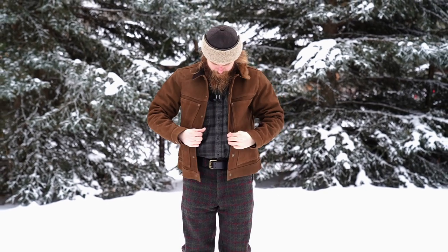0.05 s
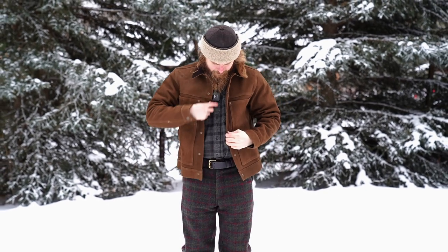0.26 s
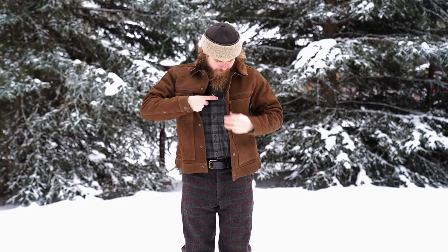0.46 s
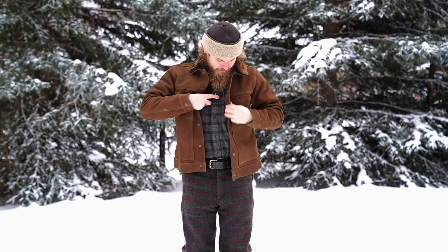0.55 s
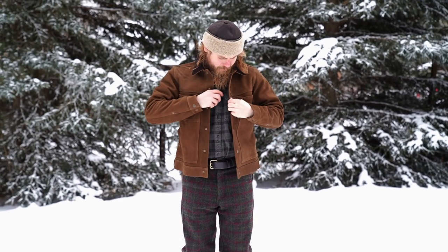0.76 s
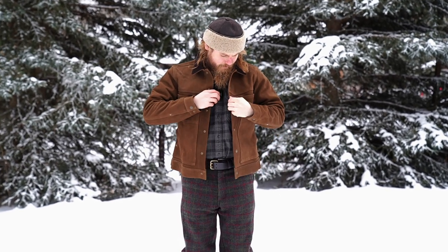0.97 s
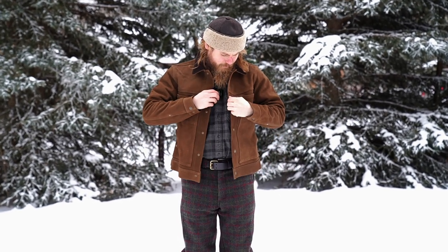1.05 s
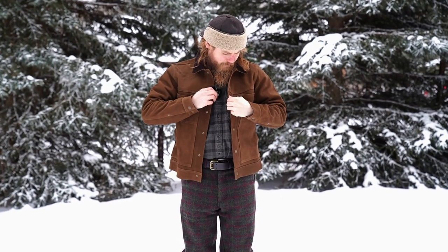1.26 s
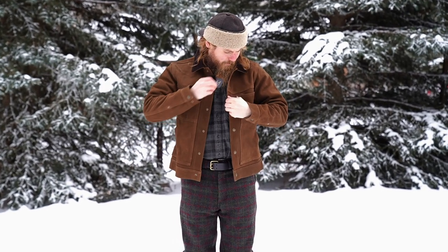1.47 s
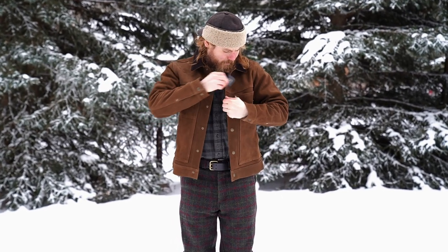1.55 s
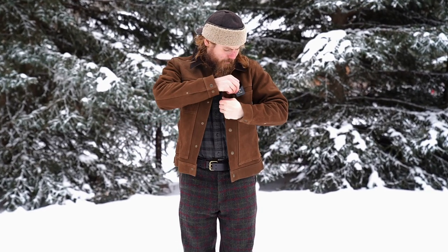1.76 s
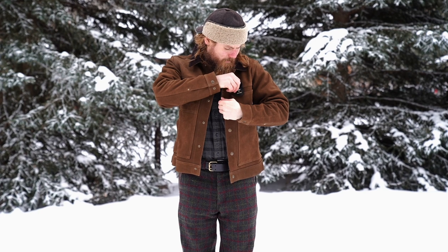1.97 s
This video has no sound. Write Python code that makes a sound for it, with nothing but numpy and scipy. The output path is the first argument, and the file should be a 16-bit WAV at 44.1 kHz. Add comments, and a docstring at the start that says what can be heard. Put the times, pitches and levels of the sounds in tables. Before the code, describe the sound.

A leather jacket rustles close up, starting softly and swelling at about 0.25 seconds. The loudest swishes, with dull flaps and light slaps, come between 0.4 and 0.8 seconds. Lighter strokes and crease ticks follow until 1.4 seconds, then the handling quiets. A soft thump precedes one sharp metal fastener snap at about 1.7 seconds. Faint rustling continues to 2 seconds, with a faint outdoor hush throughout.

```python
"""A leather jacket is pulled shut, close up and dry, on a still, snowy day.
The hide slides over a shirt in uneven strokes, a swish made of thousands of tiny slips a second.
Its heavy panels flap and buckle, folds slap down and creases tick. Near the end, fingers work
a metal fastener, which gives a short, sharp snap. A faint hush of outdoor air lies underneath."""
import sys
import numpy as np
from scipy import signal
from scipy.fft import rfft, irfft, next_fast_len
from scipy.io import wavfile
from scipy.ndimage import uniform_filter1d

SR = 44100
rng = np.random.default_rng(int(sys.argv[2]) if len(sys.argv) > 2 else 0)


def unload_audio(sound):
    """Save the sound as a 16-bit wav file, at the path given as the first command line argument."""
    columns = np.transpose(np.atleast_2d(sound))
    # keep every value between -1 and 1, then stretch to whole-number steps
    steps = np.round(np.clip(columns, -1, 1) * 32767)
    wavfile.write(sys.argv[1], SR, steps.astype(np.int16))


N = 88200

# Fader moves of the sliding hide, one table a gesture: (time [s], swish [dB], rub [dB], fizz [dB])
REACH_FADERS = [(0.0, -59, -53, -70), (0.05, -61.5, -56.5, -69.5), (0.238, -42, -45, -53),
                (0.282, -41.5, -38, -47.5), (0.419, -46, -50, -51), (0.422, -37, -35.5, -45.5),
                (0.458, -42, -43, -49.5), (0.5, -31, -32.5, -38.5), (0.54, -41, -40, -43),
                (0.554, -42.5, -47, -42.5), (0.58, -48.5, -48, -50)]
PULL_FADERS = [(0.59, -42, -43, -44.5), (0.635, -34, -38.5, -37.5), (0.69, -35.5, -37.5, -44),
               (0.75, -35.5, -39, -45.5), (0.778, -44, -42.5, -54), (0.872, -35, -49, -49.5),
               (0.91, -46, -49, -53.5), (0.966, -41.5, -49, -51), (1.0, -35.5, -46, -46),
               (1.05, -37.5, -43.5, -45), (1.068, -46, -48.5, -53), (1.08, -56.5, -58, -65)]
ALIGN_FADERS = [(1.1, -55.5, -57, -60.5), (1.15, -47, -52, -54.5), (1.18, -51, -51.5, -51.5),
                (1.22, -48, -52.5, -54), (1.258, -46, -49, -55), (1.274, -35.5, -42.5, -56),
                (1.305, -36, -44, -44), (1.328, -45.5, -48, -51), (1.345, -41, -46.5, -51),
                (1.36, -46, -58, -54), (1.374, -58, -55, -64)]
FINGER_FADERS = [(1.41, -56.5, -57, -62), (1.5, -59.5, -56, -66.5), (1.63, -59.5, -56, -71),
                 (1.7, -56, -57, -67), (1.74, -55, -56.5, -61), (1.78, -56.5, -56, -60),
                 (1.82, -52.5, -51.5, -60.5), (1.9, -52.5, -51, -64), (1.935, -55.5, -54.5, -66),
                 (1.975, -47.5, -51, -63), (2.0, -51.5, -54, -66)]
# Fader moves of the flapping panels: (time [s], level [dB])
FLAP_FADER = [(0, -69.5), (.12, -53), (.245, -48.5), (.285, -37.5), (.36, -40), (.41, -39), (.435, -35.5),
              (.46, -40.5), (.5, -36), (.535, -34.5), (.555, -51), (.605, -53), (.64, -31), (.69, -42.5),
              (.755, -45.5), (.79, -44.5), (.85, -60), (.93, -58), (1.0, -44), (1.09, -60.5), (1.15, -46),
              (1.2, -56), (1.255, -53.5), (1.31, -47), (1.35, -42), (1.385, -56.5), (1.6, -77), (1.92, -57),
              (1.96, -47.5), (2.0, -48)]
# Tone of the three sliding layers and of the panels: (frequency [Hz], gain [dB])
SWISH_EQ = [(1200, -50), (2200, -10.5), (2700, -2), (3700, -1.5), (4600, -3.5), (5700, -5), (7000, -10),
            (8200, -16.5), (11000, -38)]
RUB_EQ = [(300, -12.5), (600, -4.5), (800, -1), (1000, -0.5), (1350, 0.5), (1800, -0.5), (2400, -3.5),
          (3500, -15.5), (6000, -34.5)]
FIZZ_EQ = [(4000, -29), (6500, 3.5), (8200, 0.5), (10300, -3), (12500, -9.5), (15500, -19)]
PANEL_EQ = [(25, -35), (50, -19), (80, -6.5), (140, 1), (250, -1.5), (400, -2), (560, -4.5), (750, -5.5),
            (1200, -39)]
# Stick-slip texture: (slip rate [1/s], size spread [dB], patchiness [dB])
SWISH_GRAIN, RUB_GRAIN = (11000, 1.8, 1.46), (7000, 2.7, 1.84)
FIZZ_GRAIN, PANEL_GRAIN = (5500, 3.7, 0.91), (1500, 3.8, 1)
# Swipes over the weave: (middle [s], length [s], centre [Hz], width [Hz], level [dB])
SWIPES = [(0.247, 0.088, 2290, 805, -41.5), (0.864, 0.098, 3700, 1210, -38.5),
          (1.002, 0.11, 1350, 400, -44), (1.02, .13, 12700, 3500, -52), (1.155, 0.041, 3550, 700, -40.5),
          (1.151, 0.062, 1330, 400, -49), (1.298, 0.054, 4350, 700, -38.5), (1.67, 0.125, 5410, 190, -60),
          (1.898, 0.27, 6450, 900, -60)]
# Buckling panels: (time [s], peak [dB], low edge [Hz], high edge [Hz], polarity [+1 or -1])
BUCKLE_HITS = [(0.346, -23, 77, 243, -1), (.514, -17.5, 94.5, 530, 1), (.534, -23, 394, 755, -1),
               (0.6285, -21.5, 163, 616, -1), (0.653, -16.5, 121, 287, -1), (0.6855, -27.5, 89, 337, 1),
               (0.7252, -27, 85, 450, 1), (0.749, -29.5, 77.6, 330, -1), (1.126, -41, 220, 324, 1),
               (1.2846, -31, 100, 374, -1), (1.3082, -27.5, 73, 180, 1), (1.3145, -28.5, 105, 490, 1),
               (1.3603, -29.5, 388, 590, 1), (1.364, -35.5, 102, 266, -1), (1.6505, -23, 125, 450, 1),
               (1.707, -40.5, 89, 454, -1), (1.947, -33.5, 98, 400, 1)]
# Folds slapping down: (time [s], peak [dB])
SLAP_HITS = [(0.4217, -30), (0.5337, -21.5), (.7262, -20.5)]
# Creases letting go: (time [s], peak [dB], pitch [Hz])
TICK_HITS = [(.766, -22, 6000), (.782, -26, 5200), (.825, -22, 5000), (1.183, -30, 6000),
             (1.202, -33, 5500), (1.21, -30, 5500), (1.231, -27, 4200), (1.243, -22.5, 5600),
             (1.404, -39, 5500), (1.44, -32.5, 5200), (1.51, -38, 4500), (1.7495, -37, 7000)]
# Contacts of the fastener: (time [s], peak [dB], click T60 [s], ring against the click [dB])
SNAP_HITS = [(1.708, -31, .005, -15), (1.7113, -21, 0.0057, -25.5), (1.7172, -36, .01, -21),
             (1.7185, -27, 0.011, -19), (1.7245, -27.5, 0.0058, -11), (1.739, -34, .006, -13)]
# Ringing modes of the fastener: (frequency [Hz], relative level [dB], T60 [s])
METAL_MODES = [(900, 1.5, 0.029), (1120, 7, 0.019), (1790, 4, 0.022), (6000, 1, 0.011), (10400, -6, .012)]
# Tone of a slap, a crease tick, a metal click and the outdoor air: (frequency [Hz], gain [dB])
SLAP_EQ = [(200, -9), (1200, -0.5), (6000, -14), (15000, -27)]
CREASE_EQ = [(300, -58), (1500, -16), (2800, -3), (4500, 5), (7500, -5), (11000, -19), (22000, -41)]
METAL_EQ = [(200, -7), (900, 2), (1900, 2.5), (2700, -11.5), (4200, -2), (6300, 1), (8200, -9), (10500, 0),
            (13000, -12), (16000, -21)]
AIR_EQ = [(30, -26), (150, -3), (380, -1), (560, 4.5), (800, -3.5), (3000, -34.5)]


def amp(db):
    """Decibels to gain."""
    return 10 ** (np.asarray(db) / 20)


def unit(x):
    """Scale to rms 1."""
    return x / np.sqrt(np.mean(x ** 2) + 1e-20)


def faders(*tables):
    """Join tables end to end and draw each level column as a curve, one value a sample."""
    times, *columns = np.vstack(tables).T
    return [np.interp(np.arange(N) / SR, times, column) for column in columns]


def equalise(x, eq):
    """Minimum-phase EQ through (Hz, dB) points on a log axis, so hits have no pre-ring."""
    size = 2 * next_fast_len(len(x))
    hz, db = np.transpose(eq)
    gain_db = np.interp(np.log(np.fft.rfftfreq(size, 1 / SR) + 1), np.log(hz), db)
    cepstrum = irfft(np.log(amp(gain_db)), size)
    cepstrum[1:size // 2] *= 2
    cepstrum[size // 2 + 1:] = 0
    return irfft(rfft(x, size) * np.exp(rfft(cepstrum)), size)[:len(x)]


def place(track, start_s, sound, peak_db):
    """Drop a one-shot onto the track at the given peak level."""
    part = track[round(start_s * SR):][:len(sound)]
    part += (amp(peak_db) * sound / np.abs(sound).max())[:len(part)]


def sliding_hide(swish_db, rub_db, fizz_db):
    """Hide rubs on cloth: a swish, a duller rub under it and a fizz on top."""
    return (amp(swish_db) * friction(SWISH_EQ, SWISH_GRAIN)
            + amp(rub_db) * friction(RUB_EQ, RUB_GRAIN)
            + amp(fizz_db) * friction(FIZZ_EQ, FIZZ_GRAIN))


def friction(eq, grain):
    """Dense tiny slips of uneven size whose colour shifts as the folds move; rms 1."""
    rate, spread_db, patchy_db = grain
    slips = (rng.random(N) < rate / SR) * np.sign(rng.standard_normal(N))
    slips *= amp(spread_db * rng.standard_normal(N))
    spectrogram = signal.stft(slips, nperseg=512)[2]
    patches = uniform_filter1d(rng.standard_normal(spectrogram.shape), size=5, axis=0)  # across pitch
    patches = uniform_filter1d(patches, size=9, axis=1)  # across time
    slips = signal.istft(spectrogram * amp(patchy_db * unit(patches)), nperseg=512)[1][:N]
    return unit(equalise(slips, eq))


def weave_swipes():
    """A finger or sleeve slides on the weave: one band of noise swells and fades."""
    out, t = np.zeros(N), np.arange(N) / SR
    freqs = np.fft.rfftfreq(N, 1 / SR)
    for middle_s, length_s, hz, width_hz, db in SWIPES:
        bell = 1 / (1 + ((freqs - hz) / width_hz) ** 2) ** 2
        band = irfft(rfft(rng.standard_normal(N)) * bell, N)
        swell = np.cos(np.pi * np.clip((t - middle_s) / length_s, -.5, .5))
        out += amp(db) * unit(band) * swell
    return out


def flapping_panels():
    """The heavy panels flutter and now and then buckle, pushing a puff of air: a dull thump."""
    flap_db, = faders(FLAP_FADER)
    out = amp(flap_db) * friction(PANEL_EQ, PANEL_GRAIN)
    puff = signal.unit_impulse(SR // 10)
    for start_s, db, low_hz, high_hz, polarity in BUCKLE_HITS:
        band = signal.butter(3, [low_hz, high_hz], "bandpass", fs=SR, output="sos")
        place(out, start_s, polarity * signal.sosfilt(band, puff), db)
    return out


def fold_slaps(t60_s=0.012):
    """A fold lands flat on the shirt: a brief, broad smack."""
    out, t = np.zeros(N), np.arange(SR // 20) / SR
    for start_s, db in SLAP_HITS:
        burst = amp(-60 * t / t60_s) * rng.standard_normal(len(t))
        place(out, start_s, equalise(burst, SLAP_EQ), db)
    return out


def crease_ticks(swish_db, eq_peak_hz=4500, crinkles_per_s=44, over_swish_db=13.5):
    """Creases tick, the tighter the higher: a few clear ones over a crinkle that rides the swish."""
    out, t = np.zeros(N), np.arange(SR // 20) / SR
    for start_s, db, hz in TICK_HITS:
        tuned_eq = [(f * hz / eq_peak_hz, gain_db) for f, gain_db in CREASE_EQ]
        place(out, start_s, click(t, tuned_eq, t60_s=0.0019, scrape_db=-6), db)
    triggers = (rng.random(N) < crinkles_per_s / SR) * amp(swish_db + over_swish_db)
    tick = equalise(signal.unit_impulse(len(t)), CREASE_EQ)
    crinkle = signal.fftconvolve(triggers, tick / np.abs(tick).max())[:N]
    return out + crinkle


def click(t, eq, t60_s, scrape_db):
    """One sharp contact with a short scrape for a tail; peak 1."""
    scrape = amp(scrape_db - 60 * t / t60_s) * rng.standard_normal(len(t))
    hit = equalise((t == 0) + scrape, eq)
    return hit / np.abs(hit).max()


def fastener_snap(mode_spread_db=2.2):
    """A quick cluster of metal contacts, their ring damped by fingers and leather."""
    out, t = np.zeros(N), np.arange(SR // 10) / SR
    for start_s, db, t60_s, ring_db in SNAP_HITS:
        ring = np.zeros(len(t))
        for hz, mode_db, mode_t60_s in METAL_MODES:
            decay = amp(mode_db + rng.normal(0, mode_spread_db) - 60 * t / mode_t60_s)
            ring += decay * np.sin(2 * np.pi * hz * t)
        attack = click(t, METAL_EQ, t60_s, scrape_db=-8.5)
        place(out, start_s, attack + amp(ring_db) * ring, db)
    return out


def still_air(level_db=-57):
    """The bed: the faint, steady hush of snowy woods."""
    return amp(level_db) * unit(equalise(rng.standard_normal(N), AIR_EQ))


def scene():
    """Jacket, fastener and air, mixed dead centre, alike in both channels."""
    swish_db, rub_db, fizz_db = faders(REACH_FADERS, PULL_FADERS, ALIGN_FADERS, FINGER_FADERS)
    strokes = sliding_hide(swish_db, rub_db, fizz_db) + weave_swipes()
    flexing = crease_ticks(swish_db) + fold_slaps() + flapping_panels()
    mix = strokes + flexing + fastener_snap() + still_air()
    return np.array([mix, mix])


def record(dry, high_cut_hz=16000):
    """A brick-wall high cut takes the very top off the mix."""
    size = next_fast_len(N + SR // 2)
    passband = np.fft.rfftfreq(size, 1 / SR) < high_cut_hz
    return irfft(rfft(dry, size) * passband, size)[:, :N]


dry = scene()
out = record(dry)
unload_audio(out)
```